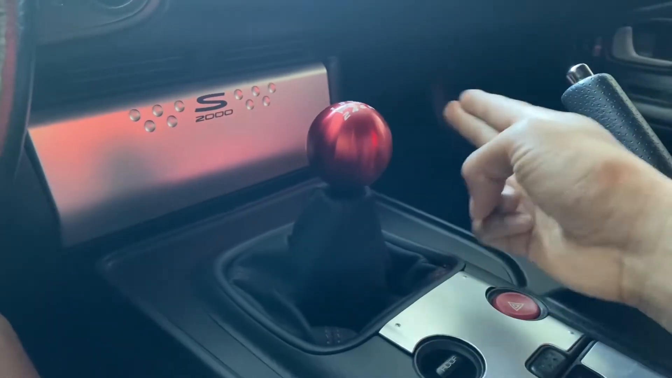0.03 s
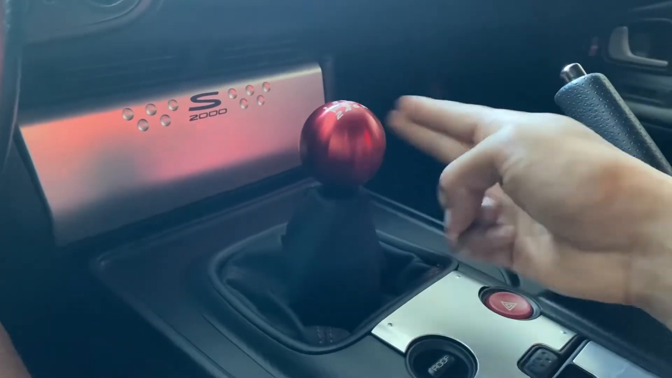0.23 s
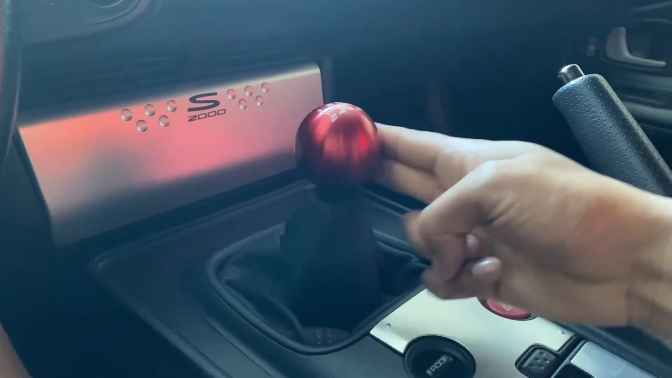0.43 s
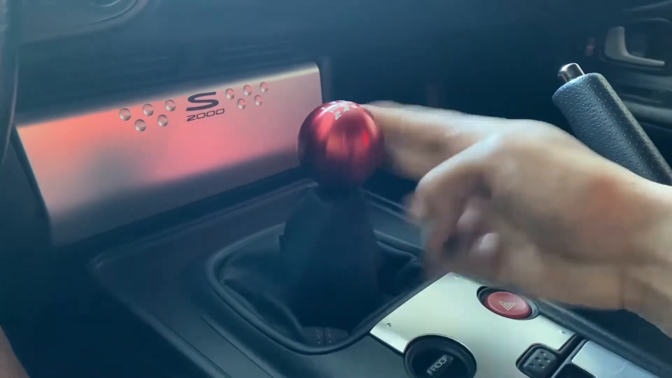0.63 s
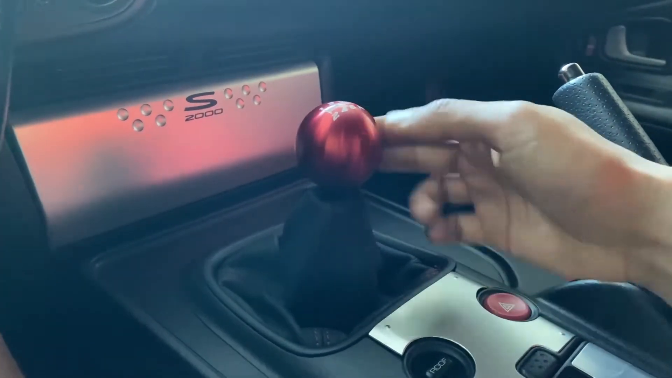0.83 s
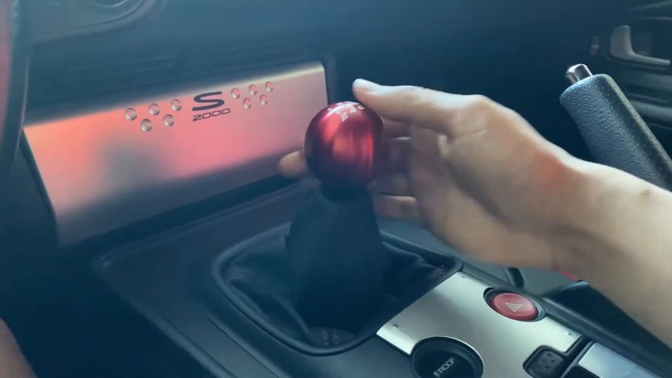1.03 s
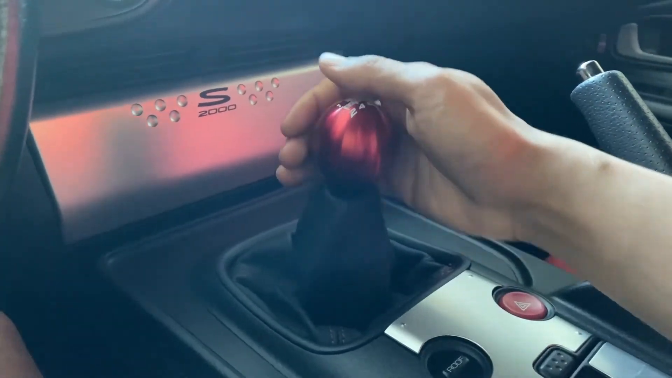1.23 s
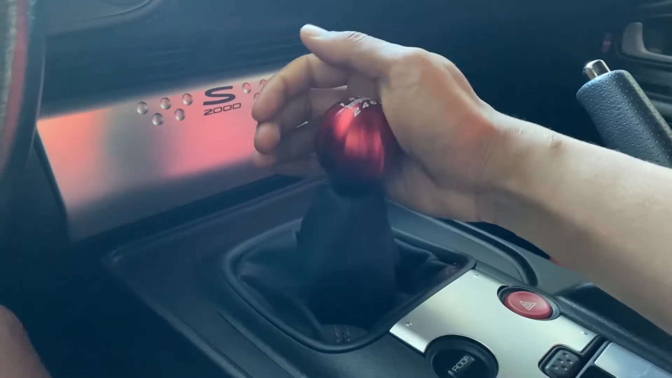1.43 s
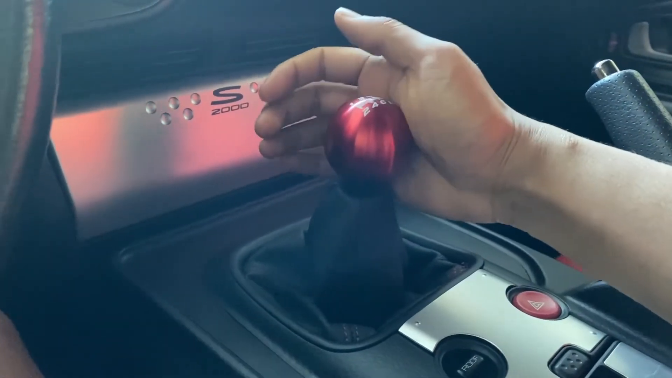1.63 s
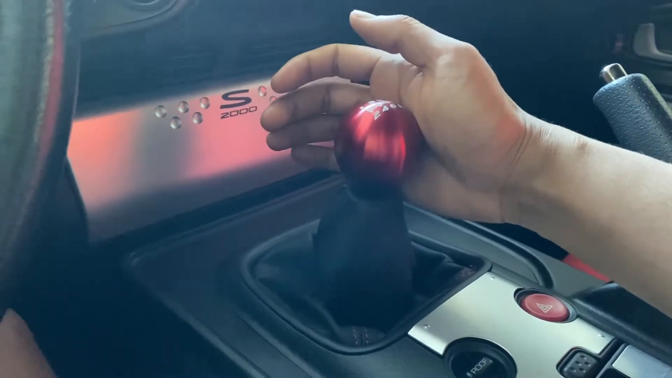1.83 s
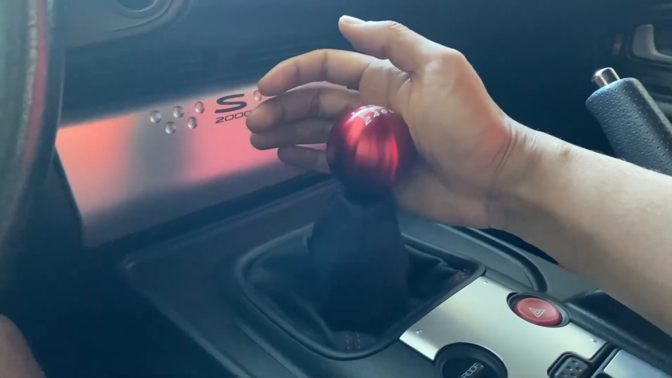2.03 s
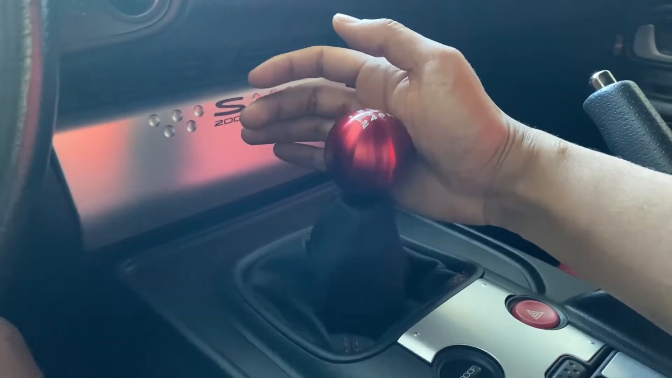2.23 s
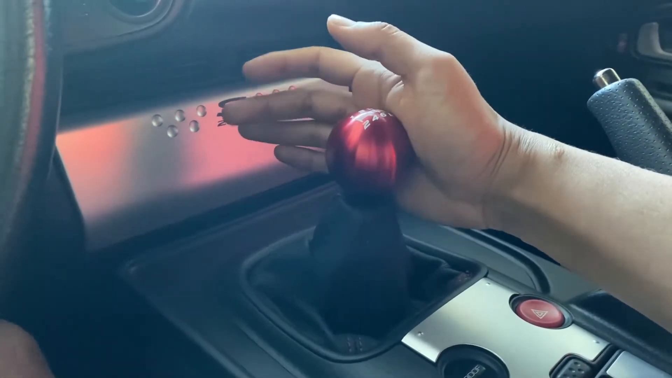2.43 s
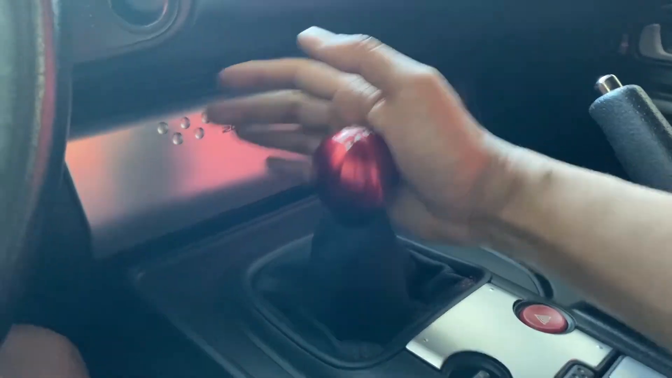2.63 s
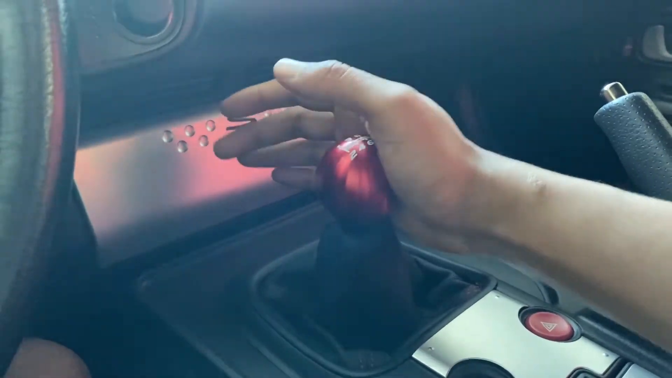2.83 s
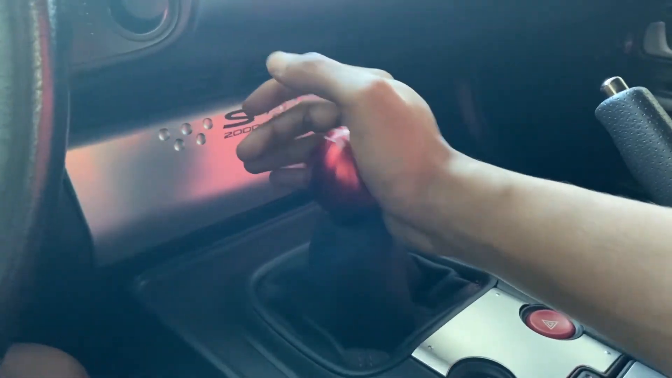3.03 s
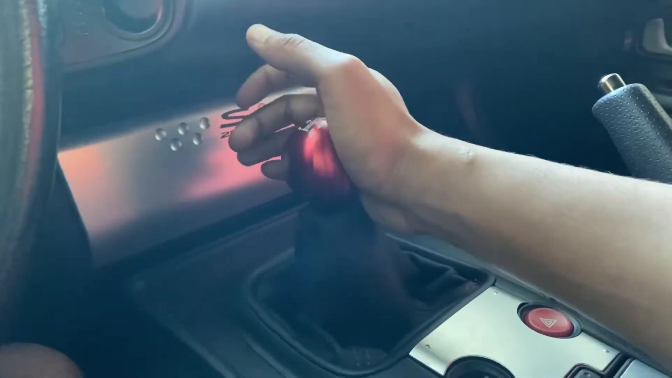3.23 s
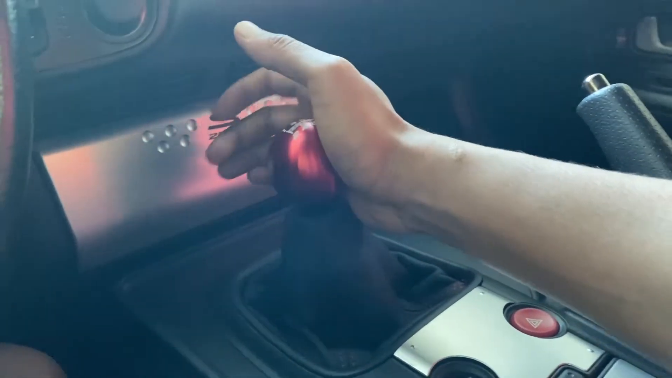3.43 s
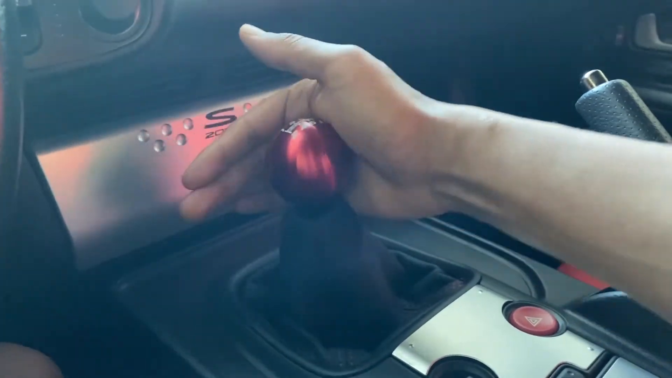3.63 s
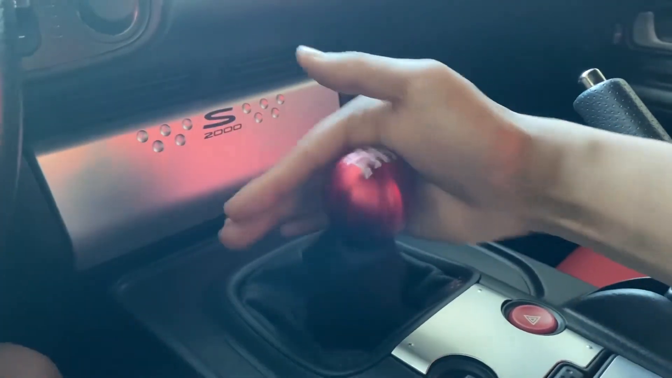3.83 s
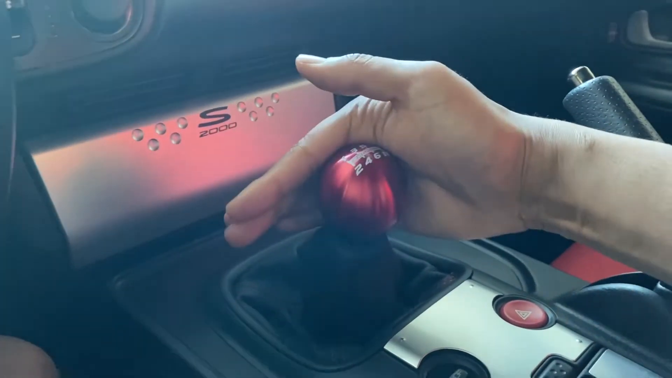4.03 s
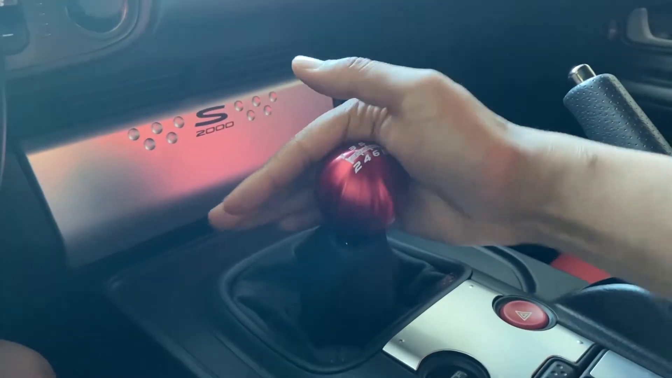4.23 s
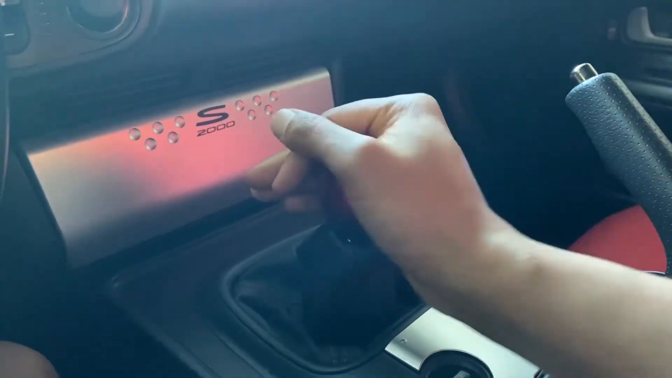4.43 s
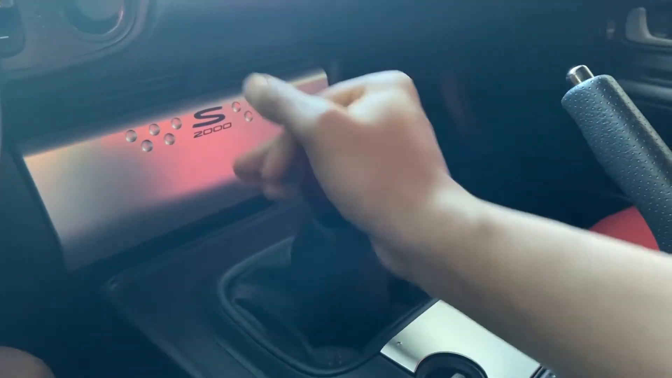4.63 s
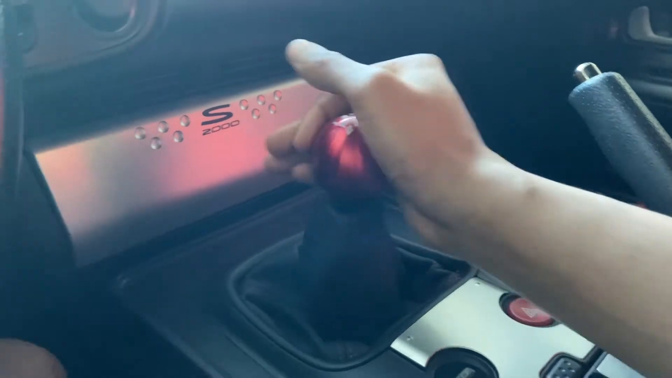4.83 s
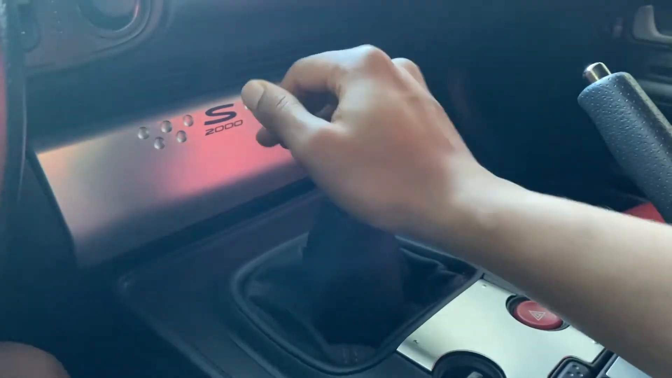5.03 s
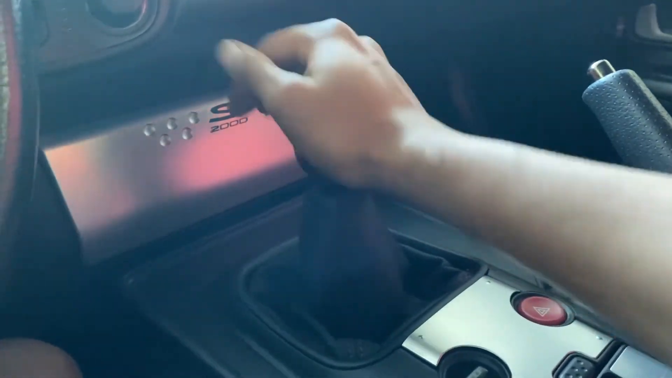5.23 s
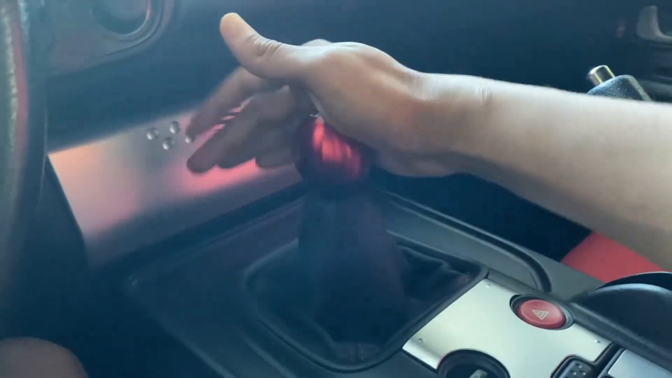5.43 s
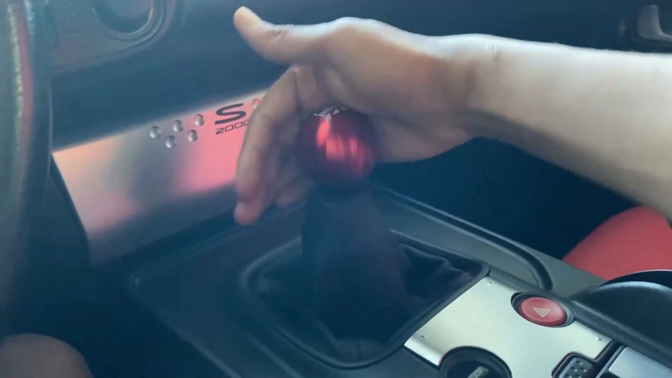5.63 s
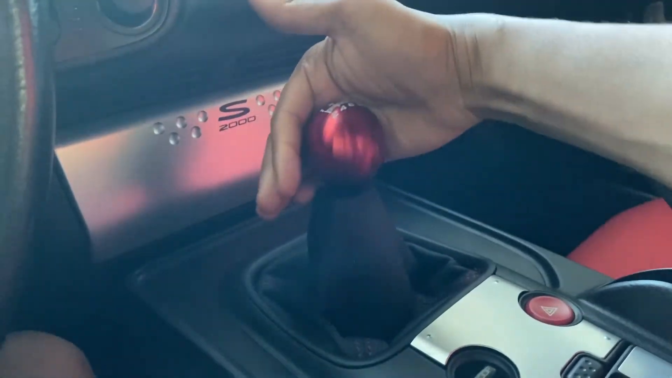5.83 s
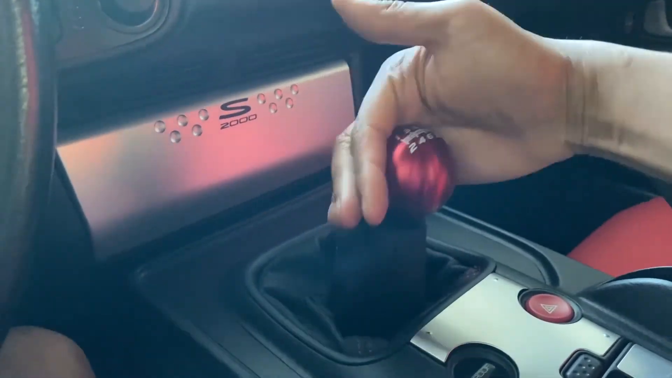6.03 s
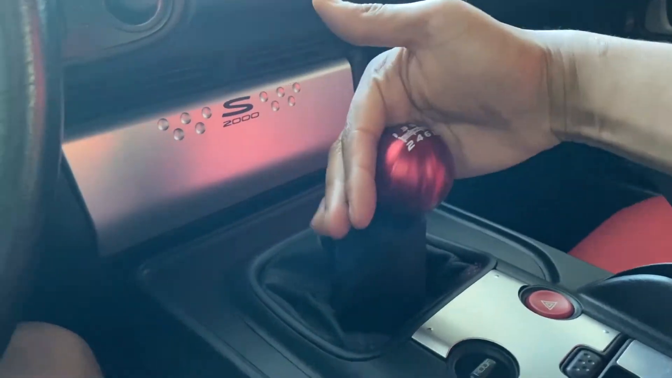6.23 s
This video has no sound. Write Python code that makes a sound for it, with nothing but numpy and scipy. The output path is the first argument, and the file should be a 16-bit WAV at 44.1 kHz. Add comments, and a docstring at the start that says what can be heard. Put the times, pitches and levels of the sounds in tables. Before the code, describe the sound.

Inside a small, padded, parked car, close and dry, over a very faint dull rumble. Three light fingertip taps on a metal gear knob come at about 0.1, 0.35 and 0.6 s, each with a short hum of the lever and followed by tiny loose ticks. From 0.9 s a palm brushes softly over the knob; around 1.7 to 2.1 s it rubs more and jolts the lever with low soft bumps. A heavy steel clunk with a deep thud lands at 2.2 s, then a fast double clunk at 2.55 and 2.6 s. Further single clunks follow at 3.1, 3.8, a softer one at 4.65, then 5.2 and a strong, hard one at 5.95 s. Each is short, with a brief scrape before it and a low rocking thump after. Irregular dry ticks, faint skin snaps and rubbing fill the gaps until about 6.3 s.

```python
"""The gear lever of a parked car goes from gate to gate, heard from the driver's seat: steel clunks in the gearbox
(shaped noise plus ringing modes) and low thumps of the drivetrain (decaying sines).
Fingers tap the metal knob, loose joints tick and skin snaps off the knob: short noise bursts, most with modes.
Palm and rods scrape: third-octave noise under friction envelopes, with random slips that ring the rods.
A faint rumble, steady noise with broad resonances, fills the small, padded cabin."""
import sys
import numpy as np
from scipy import signal
from scipy.io import wavfile

SR = 44100
rng = np.random.default_rng(int(sys.argv[2]) if len(sys.argv) > 2 else 0)


def store_wav(level_fs):
    """Save 16-bit WAV to argv[1]."""
    pcm = np.round(np.clip(np.atleast_2d(level_fs), -1, 1) * 32767)
    wavfile.write(sys.argv[1], SR, pcm.T.astype(np.int16))


N = 277830
RING_SAMPLES = int(.3 * SR)
AGE_S = np.arange(RING_SAMPLES) / SR
BANDS_HZ = 22 * 2 ** (np.arange(29) / 3)
# borders of the zones bass, body, clack, edge, air: hz
ZONE_EDGES_HZ = [140, 700, 2500, 7000]


# lever thrown against its stop: stop_s, clunk_db, hardness_db, rod_drag_db, thud_db, thud_hz, rock_db, rock_hz
SHIFTS = [(2.214, -26, -6.5, -72, -14.5, 140.7, -24.5, 77.8),
          (2.552, -30, -6, -50, -23.5, 118.5, -25.5, 64.6), (2.614, -30.5, -2, -53.5, -39, 88, -28, 51.7),
          (3.071, -28, 2.5, -43.5, -27.5, 109.5, -34.5, 59.8), (3.822, -31, 1, -41.5, -20.5, 93, -30, 56.7),
          (4.641, -39.5, 4.5, -53, -44, 126, -46, 61), (5.191, -27.5, -3, -44.5, -34, 139, -33, 58.2),
          (5.968, -23.5, 0.5, -44.5, -23, 103, -30, 70.7)]
# gearbox housing resonances: pitch_hz, level_db, t60_s
GEARBOX_MODES = [(296, -3, 0.11), (333.6, -12, 0.12), (493.6, -3, 0.062), (730, -39, 0.23),
                 (1065, -15.5, 0.19), (1174, -3.5, 0.065), (1478, -13, 0.087), (2364, -22, 0.11),
                 (3550, 6.5, 0.01), (5580, -6, 0.074)]
# clunk spectrum: freq_hz, density_db (per Hz)
CLUNK_COLOUR = [(88, -29), (150, 0), (431, -4), (745, -12), (1560, -32), (2980, -55), (3700, -50.5),
                (4950, -59.5), (5570, -54), (8400, -62), (12200, -54), (14500, -59), (16000, -60)]
CLUNK_ZONES_DB = (-0.5, -8.5, -21.5, -32.5)  # body, clack, edge, air
# detent ball drops in before the stop; level relative to the rod drag
DETENT_LEAD_S, DETENT_DB, DETENT_HARDNESS_DB = .018, 4, -0.5


def clunks(bank):
    """Steel meets steel inside the gearbox, first at the detent, then at the stop; the housing rings."""
    out = np.zeros((2, N))
    for stop_s, clunk_db, hardness_db, drag_db, *_ in SHIFTS:
        detent = contact(CLUNK_ZONES_DB, drag_db + DETENT_DB, DETENT_HARDNESS_DB)
        stop = contact(CLUNK_ZONES_DB, clunk_db, hardness_db)
        for start_s, levels_db in (stop_s - DETENT_LEAD_S, detent), (stop_s, stop):
            impact = crack(levels_db[2] - 1.5, t60_s=0.055, low_hz=670, top_hz=1800)
            body = knock(bank, CLUNK_COLOUR, levels_db, contact_s=0.0017, build_cycles=1.36,
                         damping=0.64, tail_db=-19.5, tail_t60_s=0.31)
            housing = ring(GEARBOX_MODES, levels_db, build_cycles=1.3, scatter_db=1.5)
            add(out, start_s, impact)
            add(out, start_s, from_db(-4.5) * body)
            add(out, start_s, from_db(5.5) * housing)
    return out


# palm jolts the lever: start_s, level_db, pitch_hz
BUMPS = [(1.721, -25, 134), (1.774, -25.5, 132.4), (1.807, -28, 97), (1.972, -35.5, 94.4),
         (2.112, -30.5, 73)]
BUMP_T60_S = 0.11
THUD_DELAY_S, THUD_T60_S = 0.0058, 0.095
ROCK_DELAY_S, ROCK_T60_S = 0.0127, 0.3
NUDGE_DB, NUDGE_HZ, NUDGE_T60_S = 5, 111, 0.054  # level relative to the tap


def thumps():
    """Each shift thuds in the lever's seat and rocks the drivetrain; palm and fingers only jolt the lever."""
    out = np.zeros((2, N))
    for stop_s, *_, thud_db, thud_hz, rock_db, rock_hz in SHIFTS:
        add(out, stop_s + THUD_DELAY_S, swing(thud_db, thud_hz, THUD_T60_S))
        add(out, stop_s + ROCK_DELAY_S, swing(rock_db, rock_hz, ROCK_T60_S))
    for start_s, level_db, pitch_hz in BUMPS:
        add(out, start_s, swing(level_db, pitch_hz, BUMP_T60_S))
    for start_s, level_db, _ in TAPS:
        add(out, start_s, swing(level_db + NUDGE_DB, NUDGE_HZ, NUDGE_T60_S))
    return out


def swing(level_db, pitch_hz, t60_s):
    """A heavy part swings for a few cycles: a decaying sine."""
    phase = 2 * np.pi * pitch_hz * AGE_S
    envelope = swell(0.54 / pitch_hz, t60_s)
    return from_db(level_db + 6.0) * envelope * stereo(np.sin(phase), np.cos(phase), pitch_hz)


# fingertips on the knob: start_s, level_db, hardness_db
TAPS = [(0.077, -40.5, 1), (0.355, -36.5, 2), (0.617, -37.5, 2)]
# lever resonances: pitch_hz, level_db, t60_s
LEVER_MODES = [(274.6, 3.5, 0.31), (371.3, 5.5, 0.05), (947, 20.5, 0.01), (1163, 11, 0.04),
               (1753, 5, 0.053), (2030, -41, 0.02), (2530, -42.5, 0.021), (5490, -19, 0.07),
               (7040, -9, 0.091)]
# tap spectrum: freq_hz, density_db (per Hz)
TAP_COLOUR = [(88, -31), (150, -16), (315, -21.5), (689, -29), (1240, -42), (1390, -39.5), (2550, -32.5),
              (4490, -41), (5250, -42.5), (10600, 7), (12200, -26), (14000, -1.5), (16000, -69)]
TAP_ZONES_DB = (-0.5, -9, -19.5, -14.5)  # body, clack, edge, air
# lever swaying in its rubber seat: pitch_hz, level_db, t60_s
LEVER_HUM = (288, -2, 0.29)


def taps(bank):
    """Fingertips strike the knob; the lever rings and hums on in its seat."""
    out = np.zeros((2, N))
    for start_s, level_db, hardness_db in TAPS:
        levels_db = contact(TAP_ZONES_DB, level_db, hardness_db)
        impact = crack(levels_db[4] + 5, t60_s=0.0059, low_hz=1500, top_hz=15500)
        body = knock(bank, TAP_COLOUR, levels_db, contact_s=0.00061, build_cycles=0.97,
                     damping=3.1, tail_db=-17.5, tail_t60_s=0.19)
        lever = ring(LEVER_MODES, levels_db, build_cycles=2.8, scatter_db=4.5)
        hum = ring([LEVER_HUM], levels_db, build_cycles=3.7, scatter_db=1.0)
        add(out, start_s, impact)
        add(out, start_s, from_db(-2.5) * body)
        add(out, start_s, from_db(-3.0) * lever)
        add(out, start_s, hum)
    return out


# play in the linkage taken up: start_s, level_db, hardness_db
TICKS = [(0.427, -46.5, -3.5), (0.668, -50.5, -1), (0.703, -51, -2.5), (0.965, -59.5, 7),
         (1.502, -56.5, 12), (1.719, -35.5, 1), (2.146, -47.5, -7), (2.194, -40.5, -3.5), (2.282, -51.5, 2),
         (2.316, -51, 4), (2.366, -42, -5), (2.505, -41.5, 5.5), (2.873, -49, -3), (2.962, -38.5, -7),
         (3.269, -46.5, -1), (3.430, -45, 2.5), (3.442, -50.5, 0), (3.74, -41, -1), (3.804, -38, -7.5),
         (4.23, -43.5, 4.5), (4.288, -52.5, 5.5), (4.417, -41.5, 4), (4.567, -53, 5.5), (5.011, -53, -14),
         (5.152, -46.5, -2), (5.451, -51, -12), (5.548, -52, -9.5), (5.803, -49.5, 9), (5.934, -44, 7.5),
         (6.228, -51, 3)]
# tick spectrum: freq_hz, density_db (per Hz)
TICK_COLOUR = [(88, -39), (150, -12.5), (328, 0), (555, -3.5), (689, -18), (2020, -34), (2180, -25),
               (2360, -42.5), (3700, -55), (9820, -46.5), (12200, -61), (14500, -64), (16000, -60)]
TICK_ZONES_DB = (-0.5, -11, -30, -42)  # body, clack, edge, air


def ticks(bank):
    """Loose joints of the lever close with a small dry knock."""
    out = np.zeros((2, N))
    for start_s, level_db, hardness_db in TICKS:
        levels_db = contact(TICK_ZONES_DB, level_db, hardness_db)
        impact = crack(levels_db[2] + 5, t60_s=0.008, low_hz=1130, top_hz=2240)
        body = knock(bank, TICK_COLOUR, levels_db, contact_s=0.00079, build_cycles=0.63,
                     damping=0.93, tail_db=-19.5, tail_t60_s=0.43)
        lever = ring(LEVER_MODES, levels_db, build_cycles=.6, scatter_db=1.5)
        add(out, start_s, impact)
        add(out, start_s, from_db(-1.0) * body)
        add(out, start_s, from_db(-8) * lever)
    return out


# skin sticks to the knob and lets go: start_s, level_db, hardness_db
SNAPS = [(0.756, -68.5, -15), (1.719, -55.5, -3), (2.0904, -64, 3), (2.229, -62.5, 1), (2.616, -71, -1),
         (4.214, -66.5, -5), (4.28, -77.5, 7.5), (4.669, -60, -5), (5.2008, -63.5, -0.5)]


def snaps(bank):
    """Skin peels off the polished knob with a short bright hiss."""
    out = np.zeros((2, N))
    for start_s, edge_db, hardness_db in SNAPS:
        air_db = edge_db + hardness_db + 1.0
        add(out, start_s, crack(air_db + 9, t60_s=0.04, low_hz=6100, top_hz=15000))
        hiss = knock(bank, TAP_COLOUR, {3: edge_db, 4: air_db}, contact_s=0.00083, build_cycles=0.99,
                     damping=0.67, tail_db=-25, tail_t60_s=.16)
        add(out, start_s, hiss)
    return out


# sliding spectrum: freq_hz, density_db (per Hz)
SLIDE_COLOUR = [(35, -12), (80, 6.5), (138, 7.5), (219, -26.5), (471, -15), (872, -35), (1330, -36),
                (1610, -34), (2930, -43), (7290, -44), (8280, -58), (9820, -25), (12100, -56), (14100, -45),
                (16000, -75)]
JUDDER_DB = 3  # bass relative to the body zone


def sliding(bank):
    """Rods drag in their guides and the palm brushes the knob; friction catches and slips unevenly."""
    gains = friction()
    catch, grain = drift(130), drift(790)
    flutter_db = [-1.2 + 3.2 * catch, -1.1 + 1.5 * catch, -.3 + 0.6 * grain, 0.1 + 1.8 * grain]
    zone_gains = [gains[0] * from_db(JUDDER_DB), *(gains * from_db(flutter_db))]
    out = np.zeros((2, N + RING_SAMPLES))[:, :bank[0].shape[1]]
    for band, zone, share in zip(bank, *zone_shares(SLIDE_COLOUR)):
        out = out + band * share * zone_gains[zone]
    return out + slips(gains[1], per_s=90, size_db=5.5, level_db=-3.5)


# hand over the knob: start_s, fastest_s, end_s, hiss_db, rasp_db and pressure_db (both relative to hiss_db)
STROKES = [(0.942, 1.026, 1.333, -67.5, -1.5, -13), (1.253, 1.38, 1.51, -84.5, 6, 19),
           (1.432, 1.483, 1.55, -73.5, 6.5, 14), (1.497, 1.647, 1.727, -61.5, 13.5, 14),
           (1.61, 1.746, 1.884, -57.5, 4.5, 17.5), (1.81, 1.947, 3.1, -83, 9.5, 25),
           (2.18, 2.245, 2.92, -65.5, 1.5, 22), (2.324, 2.48, 2.57, -58, 6.5, 19.5),
           (3.002, 3.04, 3.09, -63.5, 3, 9), (3.473, 3.588, 3.66, -69, 5.5, 10.5),
           (3.653, 3.788, 3.77, -62, 7, 9), (4.214, 4.295, 4.42, -75, 5, -1),
           (4.428, 4.653, 4.88, -76.5, 11, 13), (5.88, 5.9, 6.22, -72.5, 8.5, 10),
           (6.038, 6.127, 6.2, -75, -5, 17.5), (6.253, 6.291, 6.4, -74, 13, 14)]
SPEED_POWER = 2.33  # amplitude goes with this power of the speed
AIR_DB, SMOTHER_SHARE = -2, 0.19  # air relative to hiss; share of pressure_db taken off it
# rods against their drag, before and after the stop: body, clack, edge, air
RUN_UP_ZONES_DB, RUN_UP_DB_PER_S = (-3, -8.5, -19.5, -28), (196, 237, 292, 340)
SETTLE_ZONES_DB, SETTLE_DB_PER_S = (0, -12, -23, -24), (95.7, 184, 169, 225)


def friction():
    """Zone gains in time: strokes swell and fade with hand speed; rods drag up to each stop and settle."""
    t = np.arange(0, N / SR, .001)
    power = 0
    for start_s, fastest_s, end_s, hiss_db, rasp_db, pressure_db in STROKES:
        phase = np.interp(t, [start_s, fastest_s, end_s], [0, np.pi / 2, np.pi])
        speed = np.abs(np.sin(phase))
        air_db = AIR_DB - SMOTHER_SHARE * pressure_db
        zones_db = hiss_db + np.array([pressure_db, rasp_db, 0, air_db])
        power = power + np.outer(from_db(zones_db), speed ** SPEED_POWER) ** 2
    for stop_s, _, _, drag_db, *_ in SHIFTS:
        run_up_db = np.array(RUN_UP_ZONES_DB)[:, None] - np.outer(RUN_UP_DB_PER_S, stop_s - t)
        settle_db = np.array(SETTLE_ZONES_DB)[:, None] - np.outer(SETTLE_DB_PER_S, t - stop_s)
        power = power + from_db(drag_db + np.where(t < stop_s, run_up_db, settle_db)) ** 2
    return np.array([np.interp(np.arange(N) / SR, t, gain) for gain in np.sqrt(power)])


# sliding rod resonances: pitch_hz, level_db, t60_s
ROD_MODES = [(510, -1, 0.041), (1135, 0.5, 0.042), (1200, -11.5, 0.014), (1720, -6, 0.01),
             (2410, -8, 0.045)]
GRIP_OCTAVES = 0.24  # largest random pitch shift


def slips(scrape, per_s, size_db, level_db):
    """Small sudden slips of uneven size ring the rods, in six sets of slightly different pitch."""
    out, sets = np.zeros((2, N)), 6
    for _ in range(sets):
        sizes_db = size_db * np.minimum(rng.exponential(1, N), 2) + level_db
        sizes = from_db(sizes_db) * rng.choice([-1, 1], N)
        clicks = scrape * sizes * (rng.random(N) < per_s / sets / SR)
        modes = [(hz * 2 ** (GRIP_OCTAVES * rng.uniform(-0.94, 1)), db, t60_s) for hz, db, t60_s in ROD_MODES]
        rods = ring(modes, np.zeros(len(ZONE_EDGES_HZ) + 1), build_cycles=1.0, scatter_db=3.5)
        out += signal.oaconvolve(clicks[None], rods, axes=1)[:, :N]
    return out


# rumble spectrum: freq_hz, density_db (per Hz)
RUMBLE_COLOUR = [(12, -43), (20, -8.5), (44, -0.5), (107, -3), (177, -12), (210, -21), (285, -13.5),
                 (328, -38), (513, -21), (949, -25), (1330, -44.5), (9670, -52.5), (12800, -94),
                 (14700, -61), (16000, -72)]
RUMBLE_RMS_DB = -55
# cabin air resonances: freq_hz, width_hz, level_db
CABIN_MODES = [(52.4, 9.2, -56), (163, 46, -65.5), (286, 86, -67.5), (822, 67, -74.5)]


def rumble(bank):
    """Dull noise from outside seeps in; resonant noise bands stand for the cabin's air."""
    gains = from_db(at_hz(RUMBLE_COLOUR, BANDS_HZ)) * np.sqrt(BANDS_HZ)
    # reversed in time, so it does not follow the sliding noise
    out = sum(gain * band[:, ::-1] for gain, band in zip(gains, bank))
    out = from_db(RUMBLE_RMS_DB) * out / rms(out)
    for freq_hz, width_hz, level_db in CABIN_MODES:
        air = rng.standard_normal((2, N))
        for q in (freq_hz / width_hz, 2):
            air = signal.lfilter(*signal.iirpeak(freq_hz, q, fs=SR), air)
        out += from_db(level_db) * stereo(*air / rms(air), freq_hz)
    return out


# nearby hard surfaces: left_delay_ms, right_delay_ms, level_db
REFLECTIONS = [(1.9, 1.402, -18.5), (3.1, 3.7, -16), (5.7, 4.9, -16)]


def console(dry):
    """Console, dashboard and glass throw back all but the bass a few milliseconds later."""
    bright = signal.sosfilt(signal.butter(1, 450, "high", fs=SR, output="sos"), dry)
    thrown, power = bright.copy(), 1
    for *delays_ms, level_db in REFLECTIONS:
        power += from_db(level_db) ** 2
        for side, delay_ms in enumerate(delays_ms):
            add(thrown[side:side + 1], delay_ms / 1000, from_db(level_db) * bright[side])
    return dry - bright + thrown / np.sqrt(power)


HARDNESS_SHARE = (0.082, .9, 2.03, 1.9)  # body, clack, edge, air


def contact(zones_db, level_db, hardness_db):
    """Zone levels of one blow: the harder the contact, the more treble."""
    levels_db = level_db + np.array(zones_db) + hardness_db * np.array(HARDNESS_SHARE)
    return dict(enumerate(levels_db, 1))


def crack(peak_db, t60_s, low_hz, top_hz):
    """The first instant of hard contact: a band-limited noise burst, alike in both channels."""
    burst = rng.standard_normal(RING_SAMPLES) * swell(t60_s / 20, t60_s) + 1e-18
    band_hz = [low_hz, min(top_hz, .4 * SR)]
    burst = signal.sosfilt(signal.butter(2, band_hz, "band", fs=SR, output="sos"), burst)
    return from_db(peak_db) * burst / np.abs(burst).max()


# knock decay, before damping: freq_hz, t60_s
DECAY = [(150, 0.1), (500, 0.054), (1500, 0.1), (5000, 0.054), (14000, 0.084)]
LEVEL_SAMPLES = int(.02 * SR)  # burst energy equals this span at the given rms level


def knock(bank, colour, levels_db, contact_s, build_cycles, damping, tail_db, tail_t60_s):
    """The dense ring of trim and cabin after a blow: lows build more slowly, and a weak tail lingers."""
    out = np.zeros((2, RING_SAMPLES))
    start = rng.integers(0, N - RING_SAMPLES)
    for band, hz, zone, share in zip(bank, BANDS_HZ, *zone_shares(colour)):
        if zone in levels_db:
            rise_s = contact_s + build_cycles / hz
            tail = from_db(tail_db) * swell(rise_s, tail_t60_s)
            shape = swell(rise_s, at_hz(DECAY, hz) / damping) + tail
            burst = band[:, start:start + RING_SAMPLES] * shape
            burst = burst / rms(burst) * np.sqrt(LEVEL_SAMPLES / RING_SAMPLES)
            out += burst * share * from_db(levels_db[zone])
    return out


def ring(modes, levels_db, build_cycles, scatter_db):
    """Decaying sines: every blow strikes each mode with a strength of its own."""
    out = 0
    for pitch_hz, level_db, t60_s in modes:
        phase = 2 * np.pi * (pitch_hz * AGE_S + rng.random())
        zone = max(1, np.searchsorted(ZONE_EDGES_HZ, pitch_hz))
        gain = from_db(level_db + levels_db[zone] + scatter_db * rng.normal())
        envelope = swell(build_cycles / pitch_hz, t60_s)
        out = out + gain * envelope * stereo(np.sin(phase), np.cos(phase), pitch_hz)
    return out


def swell(rise_s, t60_s):
    """A ring builds up and dies away."""
    return (1 - np.exp(-(AGE_S / rise_s) ** 2)) * from_db(-60 * AGE_S / t60_s)


def noise_bank():
    """Stereo noise in third octaves, of rms 1 before the stereo spread."""
    white, bank = rng.standard_normal((3, 2, N + RING_SAMPLES)), []
    for k, hz in enumerate(BANDS_HZ):
        edges_hz = hz * 2 ** (np.array([-1, 1]) / 6)
        band_pass = signal.butter(2, edges_hz, "band", fs=SR, output="sos")
        band = signal.sosfilt(band_pass, white[k % 3])[:, RING_SAMPLES:]
        bank.append(stereo(*band / rms(band), hz))
    return bank


def zone_shares(colour):
    """Each band's zone (0 bass, 1 body, 2 clack, 3 edge, 4 air) and its share of that zone's amplitude."""
    zones = np.searchsorted(ZONE_EDGES_HZ, BANDS_HZ)
    power = from_db(at_hz(colour, BANDS_HZ)) ** 2 * BANDS_HZ
    return zones, np.sqrt(power / np.bincount(zones, power)[zones])


# stereo width: freq_hz, side_over_mid_db
WIDTH = [(30, -25), (80, -15), (170, -12), (350, -8), (600, 0), (1200, -1), (2500, -1), (6000, 1),
         (8000, -12), (14000, -14)]
# stereo balance: freq_hz, left_over_right_db
BALANCE = [(60, -0.5), (170, 1.5), (350, -3.5), (700, -0.5), (1400, 2), (5500, 4.5), (11000, -1)]
DIRECT_HZ, LEFT_LAG_SAMPLES = 7000, 13  # above this pitch the left channel lags


def stereo(mid, side, hz):
    """Bass is nearly alike in both channels, the mid range wide; the highest treble is later on the left."""
    width, sign = from_db(at_hz(WIDTH, hz)), np.array([[1], [-1]])
    spread = (mid + width * side * sign) / np.hypot(1, width)
    left, right = spread * from_db(sign * at_hz(BALANCE, hz) / 2)
    return np.array([np.roll(left, LEFT_LAG_SAMPLES * int(hz > DIRECT_HZ)), right])


def drift(knots_per_s):
    """A random wander: normal knots of spread 1 joined by lines."""
    knots = rng.standard_normal(int(N / SR * knots_per_s) + 2)
    return np.interp(np.arange(N) / SR * knots_per_s, np.arange(len(knots)), knots)


def from_db(db):
    """Decibels to amplitude."""
    return 10 ** (np.asarray(db) / 20)


def rms(x):
    """Root mean square over all channels."""
    return np.sqrt(np.mean(x ** 2) + 1e-20)


def at_hz(points, hz):
    """Read a curve at a frequency, along log frequency."""
    freqs_hz, values = np.array(points).T
    return np.interp(np.log(hz), np.log(freqs_hz), values)


def add(out, start_s, sound):
    """Mix a sound in at a time."""
    start = round(start_s * SR)
    out[:, start:start + sound.shape[-1]] += sound[..., :N - start]


def scene():
    """Contacts and rumble reflect off the console; the low thumps do not."""
    bank = noise_bank()
    contacts = clunks(bank) + taps(bank) + ticks(bank) + snaps(bank) + sliding(bank)
    return console(contacts + rumble(bank)) + thumps()


# microphone response: freq_hz, q (raised to at least .9), gain_db
MICROPHONE = [(652, 5.7, -7.5), (1150, 0.78, -0.5), (15700, 8.3, 3.5)]
CUTOFF_HZ = 16000


def record(dry):
    """The microphone dips the middle and favours the highest treble; the top is cut."""
    for freq_hz, q, gain_db in MICROPHONE:
        peak = signal.lfilter(*signal.iirpeak(freq_hz, max(q, .9), fs=SR), dry)
        dry = dry + (from_db(gain_db) - 1) * peak
    return signal.sosfilt(signal.ellip(10, .2, 80, CUTOFF_HZ, fs=SR, output="sos"), dry)


dry = scene()
out = record(dry)
store_wav(out)
```